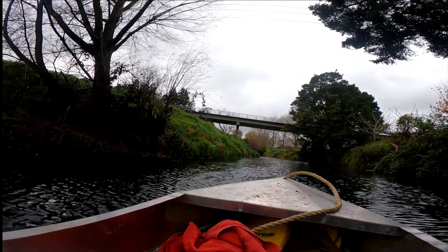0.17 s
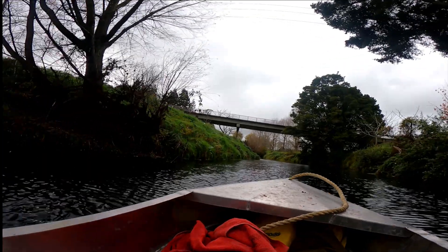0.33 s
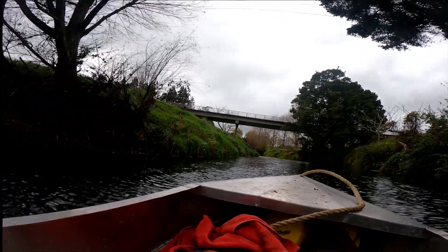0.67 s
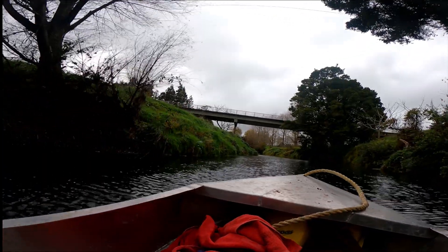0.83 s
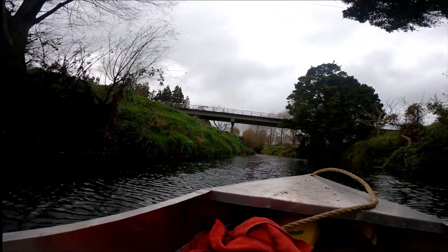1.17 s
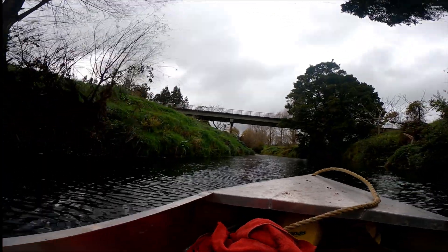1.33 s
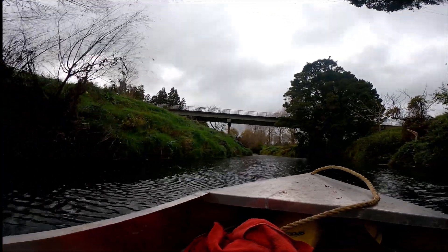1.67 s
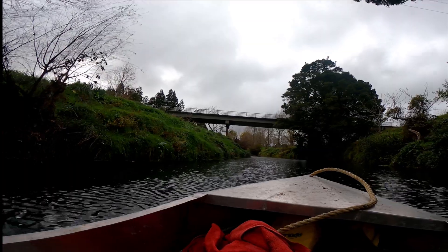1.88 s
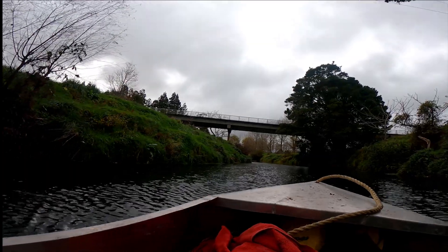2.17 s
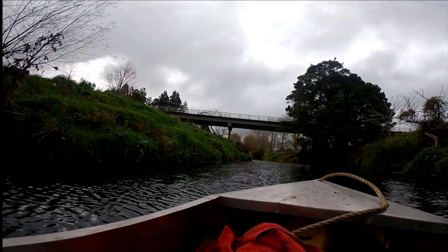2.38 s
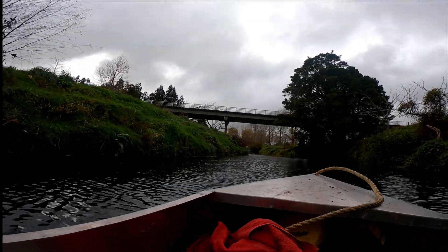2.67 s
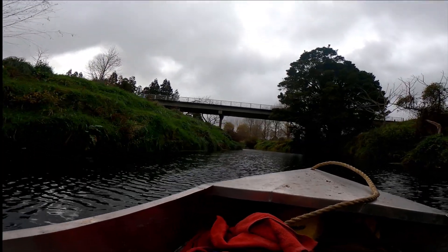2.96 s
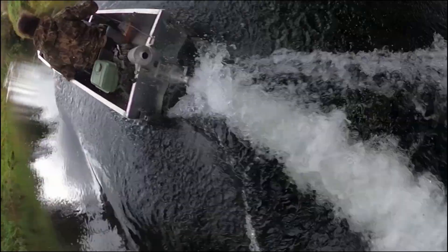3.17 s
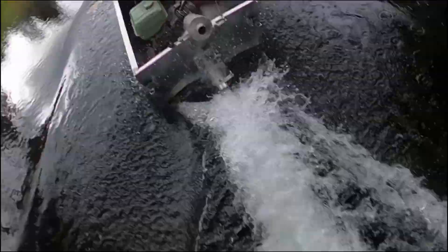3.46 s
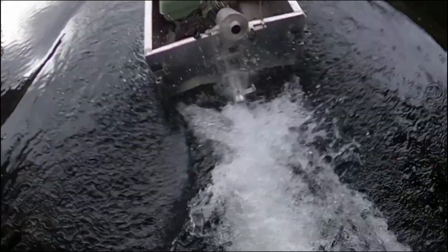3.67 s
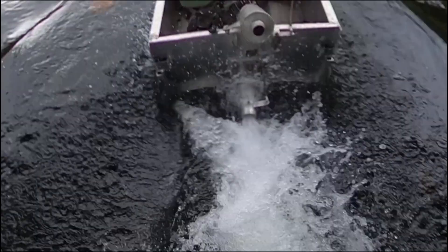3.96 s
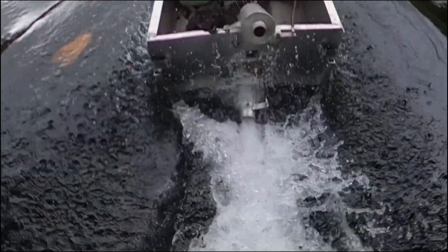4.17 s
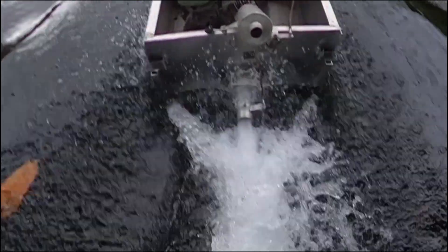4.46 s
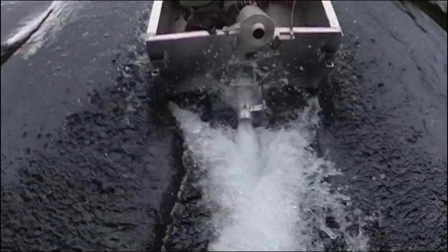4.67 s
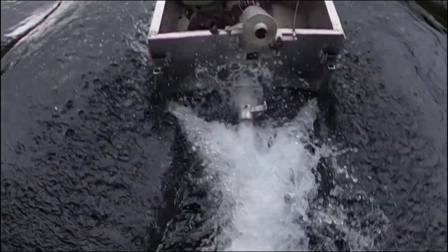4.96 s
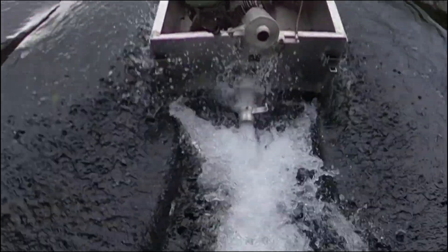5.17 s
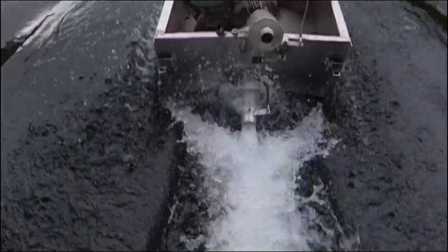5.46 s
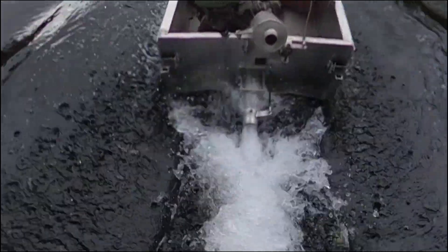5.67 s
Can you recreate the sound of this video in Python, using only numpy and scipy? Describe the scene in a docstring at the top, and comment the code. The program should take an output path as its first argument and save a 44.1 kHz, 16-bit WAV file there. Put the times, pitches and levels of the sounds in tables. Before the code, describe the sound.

A small jet boat runs on a river, its one-cylinder petrol engine firing about seventeen times a second under load, at a steady pace. For the first three seconds the microphone is at the bow: the hull booms and rings hollowly, the exhaust is muffled, and a loose part buzzes lightly over very faint ripples. A few dull knocks come in the first second and again around 2.4 seconds. Soft wind rumble rises on the microphone from about 2.5 seconds. At about 3.2 seconds a sharp click cuts to the stern, where everything is close and brighter. Each exhaust pulse thumps and cracks, the engine clatters with a metallic ring, and the jet churns the water in a surging rush with fine spray. Some pulses pop harder, around 3.7 and 5.4 seconds. Engine and water carry on until the end, near six seconds.

```python
"""On a river, aboard a small jet boat, its one-cylinder petrol engine firing 17 times a second under load.
With the microphone at the bow, the hull booms and rings, a loose part buzzes, and the exhaust is muffled,
a boat's length away. After about three seconds, with a click, the microphone is at the stern: each
exhaust pulse cracks close by, the engine clatters and the jet churns the water. Air buffets it softly."""
import sys
import numpy as np
from scipy import signal
from scipy.fft import rfft, irfft, next_fast_len
from scipy.io import wavfile
from scipy.ndimage import uniform_filter1d, map_coordinates

SR = 44100
rng = np.random.default_rng(int(sys.argv[2]) if len(sys.argv) > 2 else 0)


def transcribe(u):
    """Save the signal u as a 16-bit wav file named by the first command-line argument.

    u: samples, shape (n,) or (channels, n), limited to [-1, 1]; the rate is SR.
    q: integer samples, one column per channel.
    """
    v = np.clip(np.atleast_2d(u).T, -1, 1)
    q = np.round(v * 32767).astype(np.int16)
    wavfile.write(sys.argv[1], SR, q)


N = 256662
TIME = np.arange(N) / SR
JUMP_S = 3.1625  # the microphone goes from bow to stern


def amp(db):
    return 10 ** (np.asarray(db) / 20)


def unit(x):
    return x / np.sqrt(np.mean(x ** 2) + 1e-20)


def noise():
    return rng.standard_normal(N)


def curves(rows):
    """One value per sample for each column after the time."""
    seconds, *columns = np.transpose(rows)
    return [np.interp(TIME, seconds, column) for column in columns]


def wobble(rate):
    """A smooth random curve, rate knots a second."""
    steps = np.arange(0, N + 64, 64)
    slow = map_coordinates(rng.standard_normal(512), [steps * rate / SR], mode="mirror")
    return np.interp(np.arange(N), steps, slow)


def gritty(spiky_db):
    """A gain that jumps every millisecond, breaking smooth noise into grains."""
    return amp(spiky_db * unit(uniform_filter1d(noise(), size=40)))


def filtered(x, response):
    """x times a response of frequency."""
    size = next_fast_len(N + SR // 4)
    return irfft(rfft(x, size) * response(np.fft.rfftfreq(size, 1 / SR)), size)[:N]


def coloured(x, spectrum):
    """x shaped by (Hz, dB) points that fall away steeply past both ends, at rms 1."""
    hz, db = np.transpose(spectrum)
    hz = np.r_[hz[0] / 2, hz, hz[-1] * 2]
    db = np.r_[db[0] - 20, db, db[-1] - 80]
    return unit(filtered(x, lambda f: amp(np.interp(np.log(f + 1), np.log(hz), db))))


def ringing(x, modes):
    """x through a few damped resonances, at rms 1."""
    def response(f):
        return sum((-1) ** k * amp(db) * 1j * f * width / (hz * hz - f * f + 1j * f * width)
                   for k, (hz, width, db) in enumerate(modes))
    return unit(filtered(x, response))


def bursts(rows, rise, decay):
    """A brief swell for each (s, dB) row; rise and decay in seconds."""
    return sum(amp(db) * np.exp(np.minimum((TIME - s) / rise, (s - TIME) / decay).clip(-30, 0))
               for s, db in rows)


def cycles(speed, firing_s):
    """Engine cycles run so far: a whole number at every firing, one of which falls at firing_s."""
    turn = np.cumsum(curves(speed)[0]) / SR
    return turn - np.interp(firing_s, TIME, turn) % 1 + 2


def puffs(turn, lag, rise, decay, rest):
    """A swell at every firing (times in cycles), each of its own size, over a resting level."""
    count, age = np.divmod(turn - lag, 1)
    count = count.astype(int)
    size = amp(1.1 * rng.standard_normal(128))
    falling = size[count] * np.exp(-age / decay)
    rising = size[count + 1] * np.exp((age - 1) / rise)
    return rest + np.maximum(falling, rising)


def rattle(turn, memory):
    """Noise that partly repeats from one engine cycle to the next."""
    per_cycle = signal.lfilter([1], [1, -memory], rng.standard_normal((128, SR // 16)), axis=0)[8:]
    count = turn.astype(int)
    since_firing = np.arange(N) - np.searchsorted(count, count)
    return unit(per_cycle[count, since_firing])


def engine_note(turn, orders, swells, lag, spread, wander, wander_rate):
    """Pulses built of drifting, swelling multiples of the firing rate; spread smears each pulse."""
    multiples, db = np.transpose(orders)
    outline = np.interp(np.arange(65), np.r_[0, multiples, 64], np.r_[-30, db, -40])
    # a pulse that starts sharply and rings on has minimum phase
    phase = 2 * rfft(irfft(np.log(amp(outline)))[:64], 128).imag
    pulses, power = np.zeros(N), 0
    for k, level in enumerate(db, 1):
        angle = 2 * np.pi * k * (turn - lag - spread * k) + phase[k] + 2 * wander * wobble(wander_rate)
        size = amp(level + (curves(swells[k])[0] if k in swells else 0))
        pulses += size * np.cos(angle) * (1 + wander * wobble(wander_rate))
        power = power + size ** 2
    return unit(pulses / np.sqrt(power))


# The engine's note, heard at the bow. Each row: multiple of the firing rate, relative level in dB.
BOOM_ORDERS = [(1, -18.5), (2, -16.5), (3, -1.5), (4, -6), (5, 0.5), (6, 0), (7, -2.5), (8, 3), (9, 2.5),
               (10, 0), (11, 3), (12, -3), (13, -8), (14, -11), (15, -11), (16, -4), (17, -9.5),
               (18, -17.5)]
# Its strong orders swell and fade in turn. Each row under an order: time in seconds, lift in dB.
BOOM_ORDER_SWELLS = {4: [(.4, -4), (1.2, -2), (1.65, 5.5), (2.1, 1.5), (2.5, -5.5), (2.8, 2.5)],
                     5: [(.2, 2), (.85, 1), (1.45, -11), (1.65, 8.5), (2.0, -3), (2.3, 2), (3.0, -2)],
                     7: [(0, 2), (.6, 1), (1.0, -7), (1.4, 11), (1.8, 4), (2.05, -3.5), (2.4, -4),
                     (3.1, 1)], 8: [(.15, -22), (.45, 5), (.65, -5), (1.08, 8), (1.5, -12.5), (1.95, 7.5),
                     (2.1, 1.5), (2.45, 0.5), (2.75, -6.5), (2.98, 1)], 9: [(.05, 3.5), (.25, -6),
                     (.65, -0.5), (.82, 4), (1.05, 4), (1.38, 9.5), (1.62, -12), (2.15, -16), (2.55, 5),
                     (3.0, 0.5)], 10: [(.1, 2.5), (.35, -0.5), (1.55, -12.5), (1.88, 11), (2.3, -1),
                     (2.75, -1), (3.1, -1)], 11: [(.2, -2), (.7, 0), (.95, 4), (1.3, -4), (1.58, 6),
                     (1.9, -2), (2.2, 3.5), (2.42, -5), (2.62, 3), (2.8, -6), (2.98, 4.5)]}
# The rumble beneath it. Each row: frequency in Hz, relative level in dB.
BOOM_RUMBLE = [(12, -42), (40, -23), (90, -7), (140, 1.5), (195, -4), (228, -9.5), (285, -7.5),
               (345, -12.5), (600, -65.5)]
# The slow swell of the whole boom. Each row: time in seconds, lift in dB.
BOOM_SWELL = [(0, 0.5), (.7, -1.5), (1.1, 0.5), (2.0, 0), (2.5, 0.8), (3.1, 0)]
def hull_boom(turn):
    """Firings boom through the hull to the microphone at the bow."""
    note = engine_note(turn, BOOM_ORDERS, BOOM_ORDER_SWELLS,
                       lag=.24, spread=-.06, wander=.14, wander_rate=3.5)
    rumble = coloured(rattle(turn, memory=.3), BOOM_RUMBLE)
    return amp(-14.5 + curves(BOOM_SWELL)[0]) * (note + amp(-6.5) * rumble)


# Three bands of the exhaust, a boat's length away. Each row: frequency in Hz, relative level in dB.
GROWL_SPECTRUM = [(200, -10.5), (285, 3.5), (345, -6.5), (400, 0), (470, -3.5), (620, -14), (780, -11.5),
                  (1100, -30.5)]
RASP_SPECTRUM = [(600, -2), (800, -6), (1030, -3), (1300, -8), (1750, -16.5), (3000, -50), (6000, -68)]
HISS_SPECTRUM = [(700, -13.5), (1800, 8), (3000, 3), (4500, -2.5), (6600, -3), (8500, -10), (11200, -25),
                 (13000, -16.5), (15500, -35)]
def far_exhaust(turn):
    """The exhaust's growl, rasp and hiss arrive dulled from the far end of the boat."""
    growl = rattle(turn, memory=.3) * puffs(turn, lag=.07, rise=.2, decay=.8, rest=.7)
    rasp = rattle(turn, memory=.32) * puffs(turn, lag=.02, rise=.2, decay=.28, rest=.7)
    hiss = rattle(turn, memory=.29) * gritty(spiky_db=1)
    hiss *= puffs(turn, lag=-.048, rise=.33, decay=.51, rest=.44)
    rasp_db = -31 + (TIME - JUMP_S / 2)  # grows 1 dB a second
    return (amp(-25.5) * coloured(growl, GROWL_SPECTRUM)
            + amp(rasp_db) * coloured(rasp, RASP_SPECTRUM)
            + amp(-41.5) * coloured(hiss, HISS_SPECTRUM))


# The hull's panels, heard at the bow. Each row: resonance in Hz, width in Hz, relative level in dB.
PANEL_MODES = [(277, 33, -2.5), (403, 16, -9), (514, 34, -6.5), (630, 55, -4), (923, 56, -10.5),
               (1022, 38, -11)]
# The second panel ringing out. Each row: time in seconds, level in dB.
PANEL_SWELL = [(0, -29), (.85, -33), (1.05, -22.5), (1.3, -33.5), (1.7, -30), (2.0, -52)]
def hull_ring(turn):
    """Every firing knocks the hull's panels into a hollow ring; one panel swells for a while."""
    knocks = puffs(turn, lag=-.01, rise=.17, decay=.3, rest=.45) * amp(.7 * wobble(17))
    panels = ringing(rattle(turn, memory=.3) * knocks, PANEL_MODES)
    one_panel = ringing(rattle(turn, memory=.55) * knocks, PANEL_MODES[1:2])
    # a second, wider filter trims the hiss, leaving a hollow ring near 400 Hz
    hollow = ringing(one_panel, [(PANEL_MODES[1][0], 190, 0)])
    return amp(-28) * panels + amp(curves(PANEL_SWELL)[0]) * hollow


# Water at the bow, near the microphone. Each row: frequency in Hz, relative level in dB.
RIPPLE_SPECTRUM = [(3000, 0), (4500, 4.5), (6500, -15), (8500, -11.5), (11000, -23)]
def ripples():
    """Small waves break on the bow in brief fizzing splashes."""
    splashes = noise() * amp(4.5 * wobble(70)) * gritty(spiky_db=1.5)
    return amp(-52) * coloured(splashes, RIPPLE_SPECTRUM)


# Air right on the microphone, at bow and stern. Each row: time in seconds, level in dB.
BUFFET_LEVELS = [(0, -47), (1.6, -46.5), (2.5, -35), (2.8, -26), (3.5, -24), (4.2, -28), (5.1, -29),
                 (5.8, -36)]
# Its rumble. Each row: frequency in Hz, relative level in dB.
BUFFET_SPECTRUM = [(20, -5.5), (35, -3.5), (60, -6), (130, -5)]
def buffet():
    """Moving air rumbles softly on the microphone."""
    return amp(curves(BUFFET_LEVELS)[0] + 1.1 * wobble(7)) * coloured(noise(), BUFFET_SPECTRUM)


# A loose part near the microphone. Each row: time in seconds, first shake in dB, second shake in dB.
BUZZ_LEVELS = [(.15, -65, -68), (.28, -42, -51), (.9, -38, -39), (1.2, -45.5, -54), (2.2, -43.5, -52),
               (2.6, -50, -56)]
# Its buzz. Each row: frequency in Hz, relative level in dB.
BUZZ_SPECTRUM = [(2000, -7), (2900, -1), (4500, 0.5), (6500, 2), (8500, -12), (11000, -39)]
def loose_buzz(turn):
    """Something loose near the bow buzzes twice for each firing."""
    first_db, second_db = curves(BUZZ_LEVELS)
    first = amp(first_db) * puffs(turn, lag=-.045, rise=.11, decay=.13, rest=0)
    second = amp(second_db) * puffs(turn + .027 * wobble(13), lag=.25, rise=.042, decay=.067, rest=0)
    return coloured(noise() * gritty(spiky_db=2.5), BUZZ_SPECTRUM) * (first + second)


# The hardest firings, heard at the bow. Each row: time in seconds, relative peak in dB.
HARD_KNOCKS = [(.056, -18), (.281, -16), (.567, -14), (.696, -12.5), (.805, -15), (1.209, -25),
               (1.272, -21), (2.031, -26), (2.332, -8), (2.394, -10.5), (2.449, -14), (2.502, -6.5)]
# One such knock. Each row: frequency in Hz, relative level in dB.
KNOCK_SPECTRUM = [(280, -5), (600, 9), (800, -5), (1050, 3.5), (1400, -6), (2000, -23), (4000, -37)]
def hard_knocks():
    """A few firings hit the hull harder than the rest: a sudden, dull knock."""
    return amp(-9.5) * coloured(noise(), KNOCK_SPECTRUM) * bursts(HARD_KNOCKS, rise=.00091, decay=.008)


# Fine ticks at the bow. Each row: time in seconds, relative peak in dB.
TICKS = [(1.6877, -53), (1.7476, -47), (1.8055, -45), (1.8633, -46), (1.9207, -53), (2.0953, -51),
         (2.1564, -44), (2.2135, -49), (2.2714, -55), (2.3298, -43), (2.4485, -47), (2.7389, -43),
         (2.8551, -43), (2.9713, -42)]
# Their thin treble. Each row: frequency in Hz, relative level in dB.
TICK_SPECTRUM = [(11000, -30), (12500, 7), (13800, 0), (15500, -19)]
def loose_ticks():
    """A loose part ticks finely after some of the firings."""
    return amp(-6.5) * coloured(noise(), TICK_SPECTRUM) * bursts(TICKS, rise=.0015, decay=.004)


# The engine's pace with the microphone at the bow. Each row: time in seconds, firings a second.
BOW_FIRING_RATE = [(0.0, 17.16), (0.54, 16.95), (1.15, 17.27), (1.31, 17.2), (3.16, 17.14)]
def bow():
    """At the bow the engine, a boat's length away, is heard mostly through the hull."""
    turn = cycles(BOW_FIRING_RATE, firing_s=.1127)
    engine = hull_boom(turn) + far_exhaust(turn) + hull_ring(turn) + hard_knocks()
    return engine + loose_buzz(turn) + loose_ticks() + ripples()


def jump_click(age):
    """A sharp click with a small low bump, where the sound cuts from bow to stern."""
    click = np.sign(age) * np.exp(-np.abs(age) / .0003)
    bump = np.sin(2 * np.pi * 400 * age) * np.exp(-np.abs(age) / .002)
    return amp(-8) * (click + bump)


# The engine's note, close to the pipe. Each row: multiple of the firing rate, relative level in dB.
PIPE_ORDERS = [(1, 3), (2, 5.5), (3, -19.5), (4, 4), (5, 4), (6, 5), (7, -7), (8, 0), (9, 5), (10, 3),
               (11, -22), (12, -11), (13, -19), (14, 2.5), (15, -9), (16, 2.5), (17, -18.5), (18, -18.5),
               (19, -11), (20, -15.5)]
# Its strong orders swell and fade in turn. Each row under an order: time in seconds, lift in dB.
PIPE_ORDER_SWELLS = {4: [(3.2, -1), (3.8, 2), (4.1, -9), (4.4, 3), (5.8, 3)], 6: [(3.2, 1), (3.7, -1),
                     (4.3, -5), (4.6, 1), (5.2, 4), (5.6, -3)], 8: [(3.2, -5), (4.1, -4), (4.4, 3),
                     (5.0, -7), (5.5, 6.5), (5.8, -6)], 9: [(3.25, 4.5), (3.8, -2.5), (4.6, 0),
                     (5.3, -4.5)], 10: [(3.2, -8), (3.9, -0.5), (5.0, 1), (5.7, 2)], 16: [(3.3, 5),
                     (3.65, 1), (3.95, 5), (4.4, -3.5), (5.8, -2)]}
# The rumble beneath it. Each row: frequency in Hz, relative level in dB.
PIPE_RUMBLE = [(10, -38), (40, -36), (100, 0), (150, -2.5), (205, -2.5), (265, -5.5), (330, -3.5),
               (450, -15.5), (800, -61)]
def exhaust_thump(turn):
    """Each slug of gas leaves the pipe with a push, then a suck, over the pipe's low note."""
    note = engine_note(turn, PIPE_ORDERS, PIPE_ORDER_SWELLS,
                       lag=-.018, spread=.0005, wander=.16, wander_rate=3)
    lag = width = .036  # cycles
    offset = ((turn - lag + .5) % 1 - .5) / width
    slug = unit(-offset * np.exp(-offset ** 2 / 2))
    rumble = coloured(rattle(turn, memory=.45), PIPE_RUMBLE)
    return amp(-3.2) * note + amp(-9.8) * slug + amp(-6.5) * rumble


# The exhaust valve at close range. Each row: frequency in Hz, relative level in dB.
SNAP_SPECTRUM = [(1500, 16), (4500, 1), (8500, 15), (12000, 4), (15500, -32)]
def valve_snap(turn):
    """The valve opens with a spike, gas sizzles after it, and it shuts with a faint tick."""
    opening = puffs(turn, lag=-.025, rise=.014, decay=.024, rest=0)
    sizzle = puffs(turn, lag=-.02, rise=.06, decay=.12, rest=0) * amp(3.5 * wobble(60))
    shutting = puffs(turn, lag=.68, rise=.02, decay=.03, rest=0)
    valve = noise() * gritty(spiky_db=4) * (opening + .5 * sizzle + .14 * shutting)
    uneven = amp(1.2 * wobble(17))  # some firings snap harder than others
    return amp(-23) * coloured(valve * uneven, SNAP_SPECTRUM)


# The pipe's crack at close range. Each row: frequency in Hz, relative level in dB.
CRACK_SPECTRUM = [(200, 6.5), (550, -3.5), (1400, -0.5), (3000, -10), (5000, -14), (8500, -62)]
def exhaust_crack(turn):
    """Every pulse cracks as it leaves the pipe."""
    pulses = noise() * puffs(turn, lag=.0023, rise=.042, decay=.11, rest=.04)
    return amp(-4) * coloured(pulses, CRACK_SPECTRUM)


# The engine, close to the microphone. Each row: frequency in Hz, relative level in dB.
CLATTER_SPECTRUM = [(250, -27), (520, 1.5), (850, -3), (1100, -1.5), (1400, -5), (1950, 1), (2600, -29),
                    (3200, -10), (5000, -16), (8000, -22), (14000, -56.5)]
def engine_clatter(turn):
    """The engine clacks just before each pulse and clatters after it."""
    knocks = puffs(turn, lag=.027, rise=.098, decay=.42, rest=.31)
    clacks = amp(-6) * puffs(turn, lag=-.18, rise=.025, decay=.085, rest=0)
    return amp(-4) * coloured(rattle(turn, memory=.34) * (knocks + clacks), CLATTER_SPECTRUM)


# The engine's metal, close by. Each row: resonance in Hz, width in Hz, relative level in dB.
METAL_MODES = [(951, 90, 1.5), (1492, 96, 0), (1760, 150, -6), (2940, 155, -5.5), (4100, 130, -22)]
def metal_ring(turn):
    """Firings set the engine's metal ringing; the ring fades slowly as the boat runs on."""
    strikes = rattle(turn, memory=.57) * puffs(turn, lag=0, rise=.025, decay=.8, rest=.52)
    fade_db = -1.7 * np.maximum(TIME - JUMP_S, 0)
    return amp(-3.5 + fade_db) * ringing(strikes, METAL_MODES)


# Churned water just off the stern. Each row: frequency in Hz, relative level in dB.
WASH_SPECTRUM = [(150, -17), (450, 1), (1000, -1.5), (1900, 0.5), (2600, -4.5), (3300, -8), (4200, -10.5),
                 (6000, -20.5), (8000, -34), (10000, -44), (13000, -45), (15500, -63)]
def jet_wash():
    """The jet tears up the river: a surging rush made of countless tiny splashes."""
    splashes = coloured(noise() * gritty(spiky_db=2), WASH_SPECTRUM)
    return amp(-3 + .68 * wobble(16)) * splashes


# Spray landing behind the boat. Each row: frequency in Hz, relative level in dB.
SPRAY_SPECTRUM = [(3000, -3), (5000, 1), (8000, -1), (10000, -10), (13000, -18), (15000, -32)]
def jet_spray():
    """Drops thrown up by the jet patter back on the river in small clusters."""
    drops = noise() * gritty(spiky_db=3.5) * amp(6 * wobble(45))
    return amp(-22) * coloured(drops, SPRAY_SPECTRUM)


# The hardest pops, close to the pipe. Each row: time in seconds, relative peak in dB.
HARD_POPS = [(3.2774, -23), (3.3962, -26), (3.5169, -29), (3.6371, -21), (3.7564, -24), (3.8167, -32),
             (3.935, -26), (4.1689, -32), (4.4054, -26), (4.6394, -27), (4.817, -28.5), (4.9342, -29),
             (5.4056, -26), (5.5844, -29), (5.6426, -24.5), (5.7608, -25)]
# One such pop. Each row: frequency in Hz, relative level in dB.
POP_SPECTRUM = [(1200, 3), (4000, 5), (8500, 11), (12000, -13), (15500, -24)]
def hard_pops():
    """Some exhaust pulses leave with a short, bright pop."""
    gas = coloured(noise() * gritty(spiky_db=1.5), POP_SPECTRUM)
    return amp(-7) * gas * bursts(HARD_POPS, rise=.00074, decay=.0029)


# The hardest cracks, close to the pipe. Each row: time in seconds, relative peak in dB.
HARD_CRACKS = [(3.700, -4.5), (3.760, -15), (3.820, -6.5), (5.053, -31), (5.350, -5), (5.466, -9)]
def hard_cracks():
    """A few exhaust pulses crack harder than the rest."""
    return amp(-8) * coloured(noise(), CRACK_SPECTRUM) * bursts(HARD_CRACKS, rise=.001, decay=.0014)


# The engine's pace with the microphone at the stern. Each row: time in seconds, firings a second.
STERN_FIRING_RATE = [(3.16, 16.91), (3.54, 16.63), (4.08, 17.02), (5.37, 16.98), (5.82, 16.76)]
def stern():
    """At the stern the pipe, the engine and the jet are all close to the microphone."""
    turn = cycles(STERN_FIRING_RATE, firing_s=3.2215)
    turn += .005 * wobble(17)  # no two firings are timed quite alike
    thump = exhaust_thump(turn)
    engine = valve_snap(turn) + exhaust_crack(turn) + engine_clatter(turn) + metal_ring(turn)
    water = jet_wash() + jet_spray()
    return amp(-16.5) * thump + amp(-25.5) * (engine + water) + hard_pops() + hard_cracks()


def scene():
    """One microphone at the bow, then at the stern, with a click between and moving air throughout."""
    age = TIME - JUMP_S
    fade_in = np.clip(age / .006, 0, 1)
    boat = np.where(age < 0, bow(), fade_in * stern())
    return (boat + jump_click(age) + buffet())[None]


def record(dry):
    """The recorder rounds off the highest peaks and keeps nothing above its band limit."""
    ceiling, top_hz, roll_off_hz = .8, 15750, 700
    rounded = dry / (1 + np.abs(dry / ceiling) ** 6) ** (1 / 6)
    return filtered(rounded[0], lambda hz: np.clip((top_hz - hz) / roll_off_hz, 0, 1))[None]


dry = scene()
out = record(dry)
transcribe(out)
```